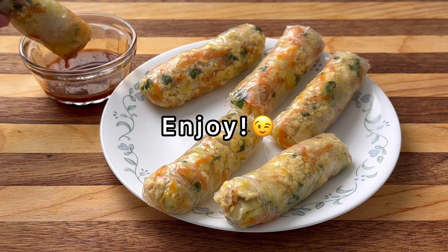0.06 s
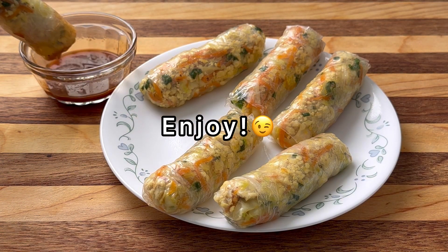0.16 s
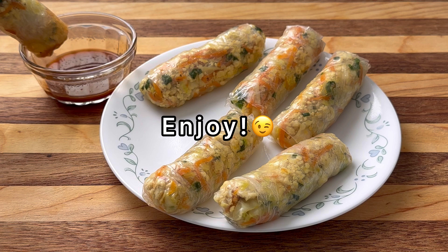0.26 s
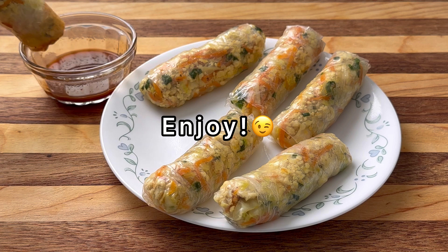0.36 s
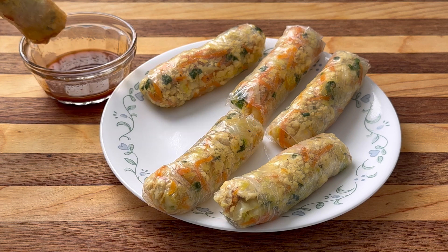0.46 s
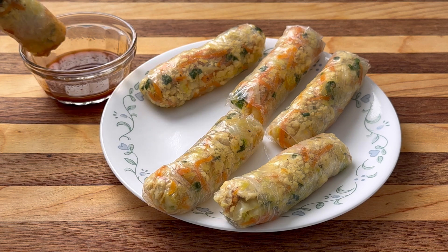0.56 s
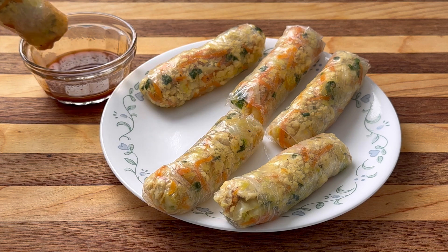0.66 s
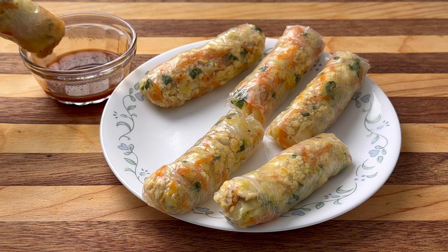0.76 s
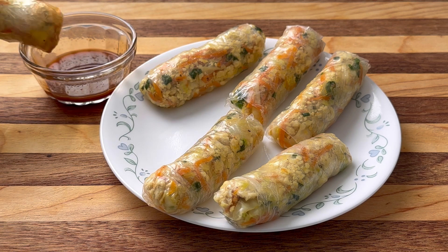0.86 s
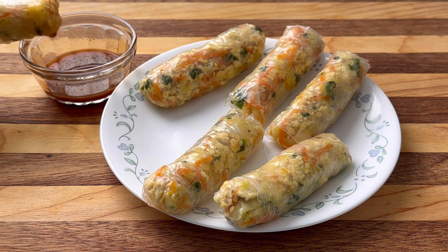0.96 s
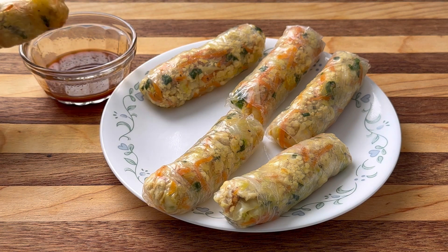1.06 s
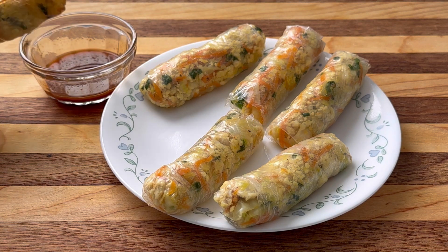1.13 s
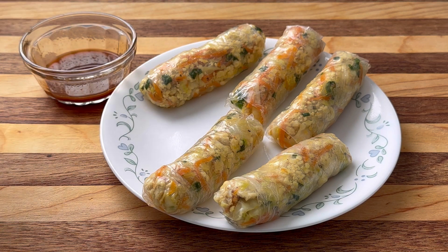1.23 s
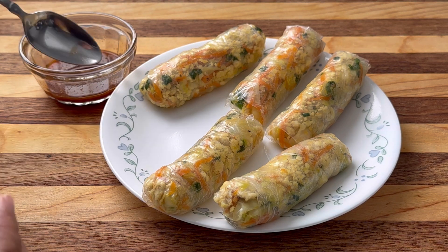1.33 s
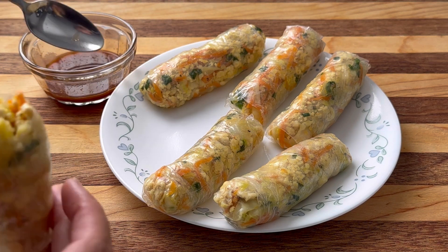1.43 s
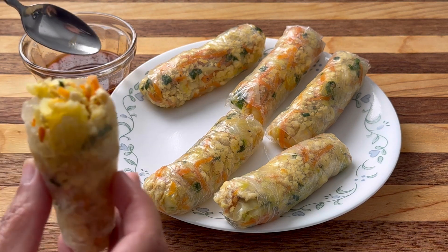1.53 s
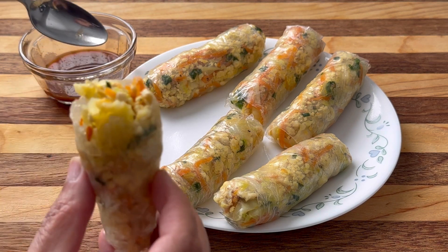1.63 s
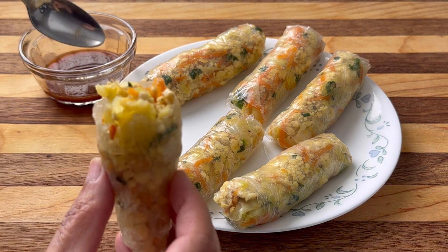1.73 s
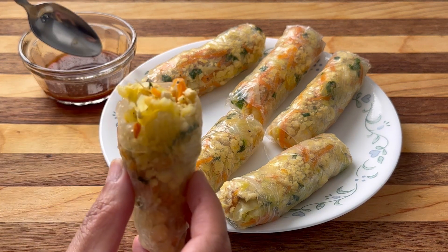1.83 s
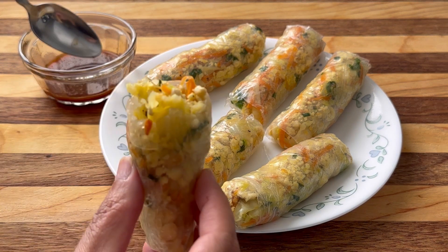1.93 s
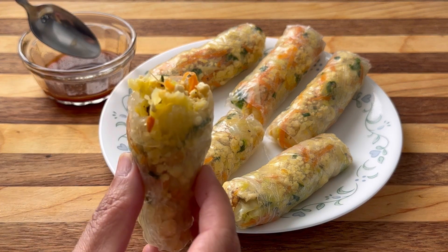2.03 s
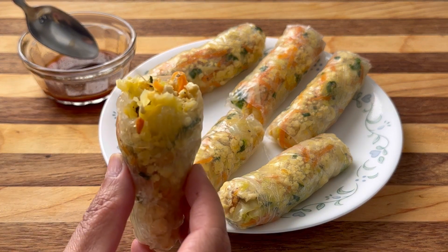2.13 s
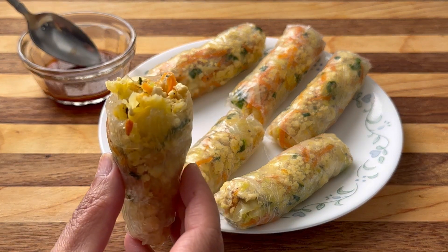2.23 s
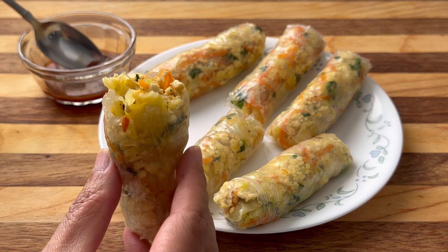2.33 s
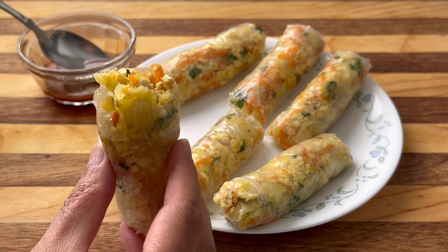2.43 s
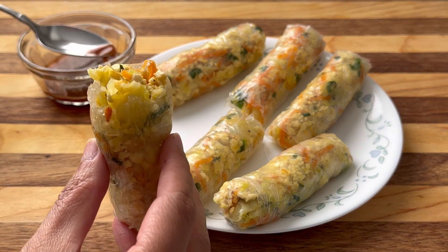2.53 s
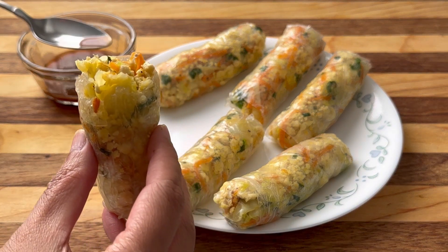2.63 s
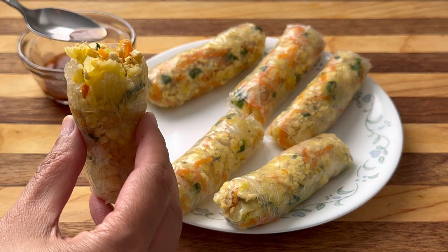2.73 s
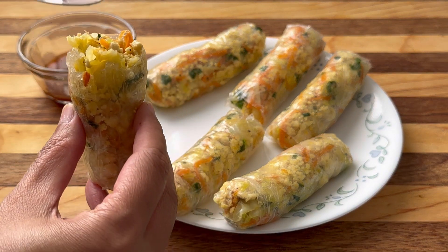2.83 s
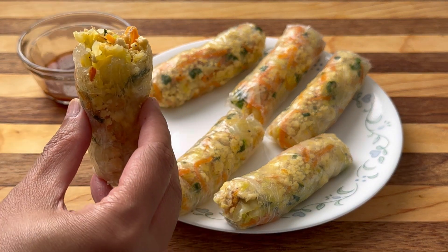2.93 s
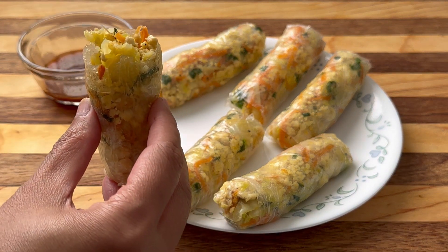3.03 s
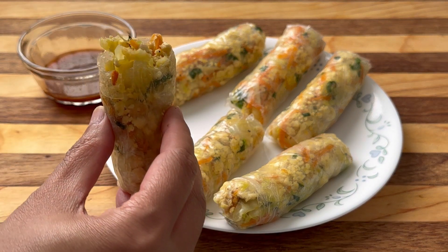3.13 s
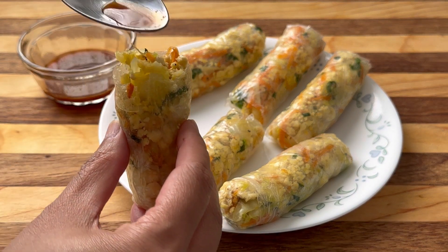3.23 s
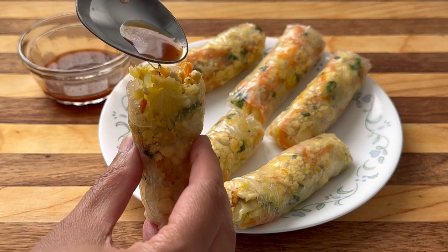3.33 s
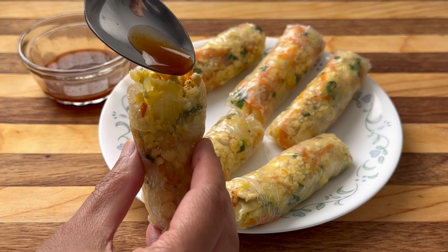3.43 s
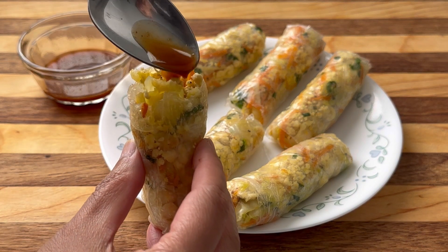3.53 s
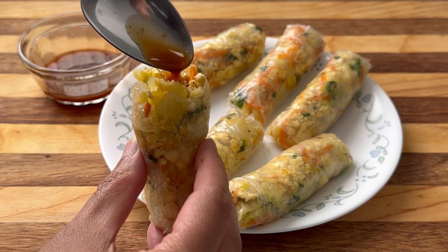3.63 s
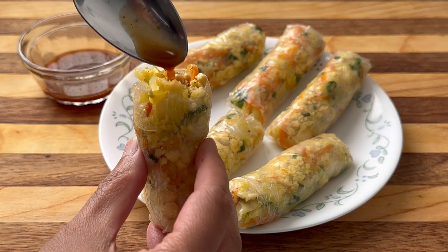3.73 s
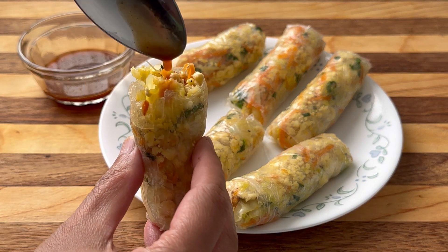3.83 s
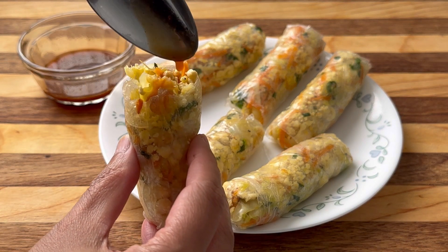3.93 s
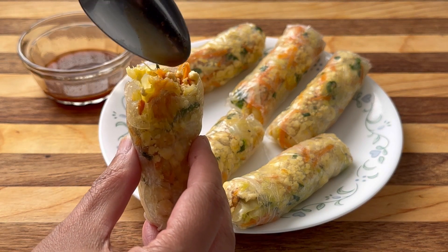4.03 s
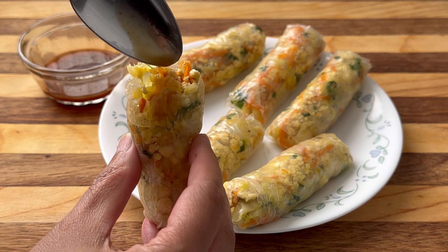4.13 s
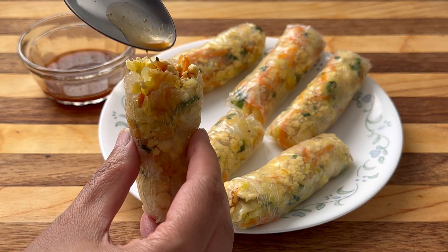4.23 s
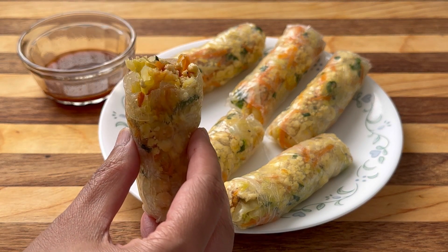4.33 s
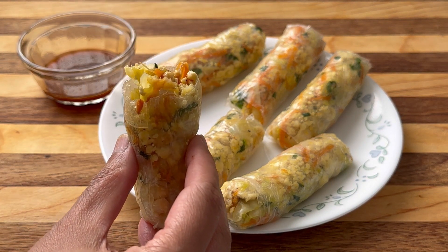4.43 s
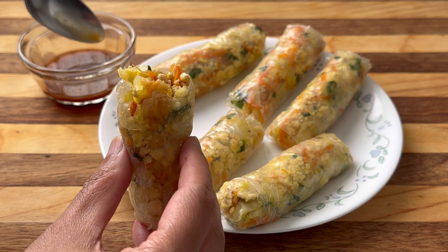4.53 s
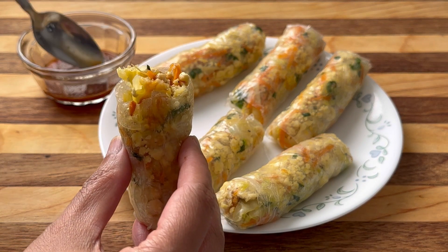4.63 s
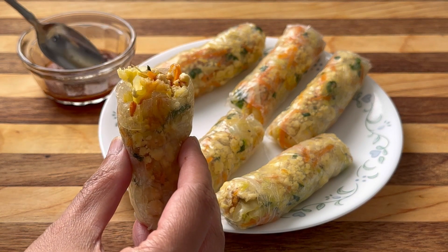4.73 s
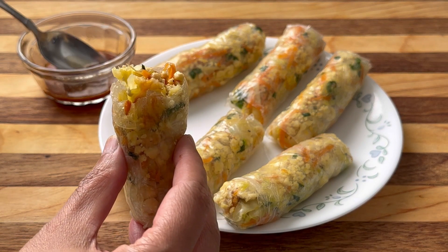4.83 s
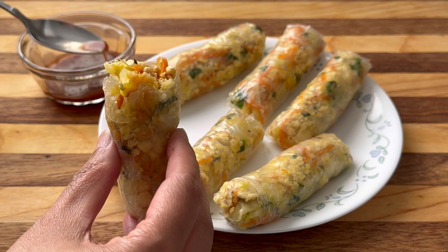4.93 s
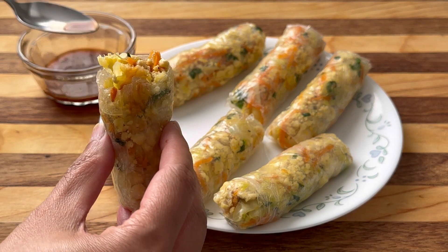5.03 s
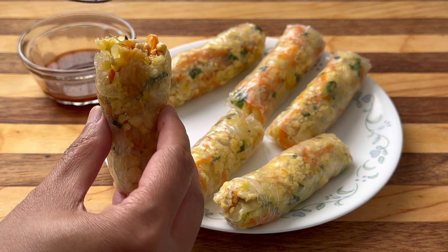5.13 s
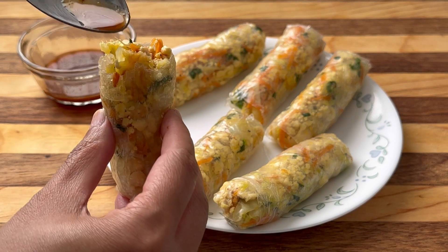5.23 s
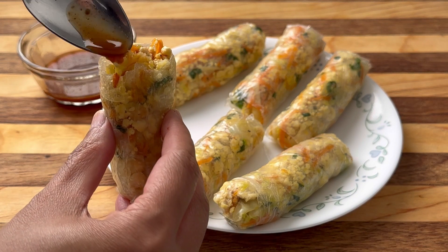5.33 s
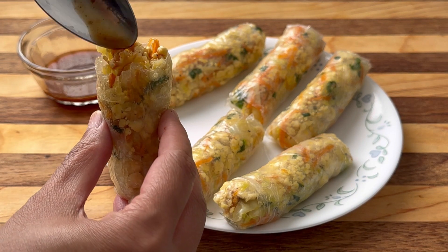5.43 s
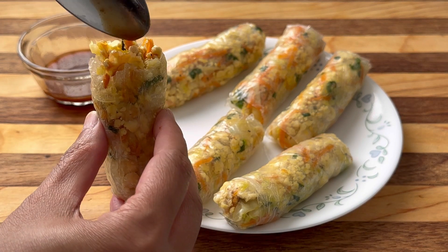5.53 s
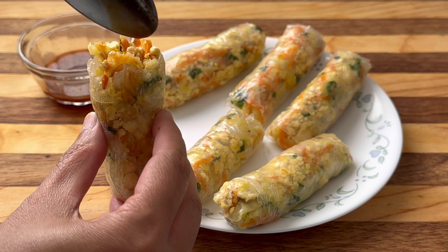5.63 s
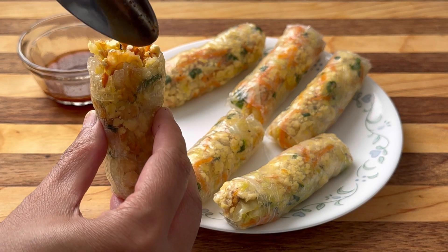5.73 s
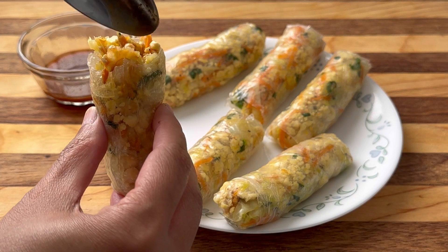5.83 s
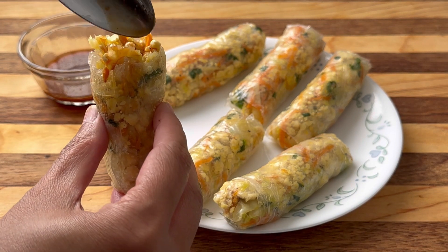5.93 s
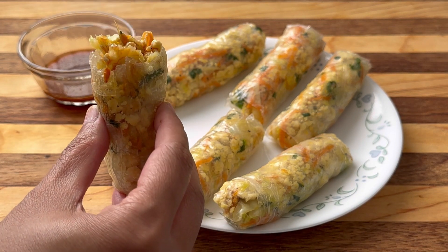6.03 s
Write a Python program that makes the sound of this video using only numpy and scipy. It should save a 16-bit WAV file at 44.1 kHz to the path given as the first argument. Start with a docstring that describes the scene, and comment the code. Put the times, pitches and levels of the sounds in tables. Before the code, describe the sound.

A quiet kitchen heard close above a wooden board, with soft room air, faint hiss, a low hum and wavering far engine drones. A faint wet smack comes at 0.3 s and a barely audible spoon touch on a small glass bowl at 0.6 s. Around 1.1 s there is a low bump; from 1.4 s sticky smacks and fine crackle thicken, with dull finger rubs from 1.6 s. A deeper thud at 1.9 s precedes two bright, short-ringing steel-on-glass clinks at 2.1 and 2.25 s. Another soft thud and handling rumble come near 2.85 s, then scattered moist squishes through 3 to 4 s. A near low drone surges from 4.1 to about 4.9 s; a lighter clink sounds at 4.75 s. The drone returns harsher from 5.15 s, fading near 5.9 s as stronger wet smacks close at 6 s.

```python
"""A quiet kitchen, heard from just above a wooden board: room air, hum and a drone as of engines outside.
Soft wet smacks and sticky crackle of food start at 0.3 s; a steel spoon touches a small glass bowl at 0.6 s.
Dull bumps follow from 1.1 s, finger rubs from 1.6 s, then two bright clinks at 2.1 to 2.3 s.
The near drone surges at 4.1 s and, harsher, at 5.2 s, with a light clink between.
Struck modes make the clinks, shaped noise the wet sounds, wavering sines the drones."""
import sys
import numpy as np
from scipy import signal
from scipy.fft import rfft, irfft
from scipy.io import wavfile
from scipy.ndimage import uniform_filter1d

SR = 44100
rng = np.random.default_rng(int(sys.argv[2]) if len(sys.argv) > 2 else 0)


def wav_out(sig):
    """Save sig, one row per channel (or a flat mono array), as 16-bit PCM at SR to the path in sys.argv[1]."""
    wavfile.write(sys.argv[1], SR, np.round(np.clip(np.atleast_2d(sig).T, -1, 1) * 32767).astype(np.int16))


N = 267687
TIME = np.arange(N) / SR
BIN_HZ = np.maximum(np.fft.rfftfreq(N, 1 / SR), 1)
LEFT_RIGHT = np.array([[1], [-1]])

# wet smacks, levels ahead of the common trim: onset [t/s], body, fizz, sheen [level/dB],
# low pocket, high pocket [f/Hz], high pocket [level/dB], rise [t/s]
SMACKS = [(0.266, -75.5, -83, -85, 2380, 3900, -88, 0.019), (0.942, -70, -78, -88, 1670, 9100, -82, 0.012),
          (.994, -76, -86, -86, 1500, 8970, -78, 0.0082),
          (1.365, -71.5, -78.5, -84, 1890, 5950, -84, 0.024),
          (1.434, -66, -84, -84, 1800, 9180, -86, 0.013), (1.472, -67.5, -76, -73, 2680, 6200, -81, 0.018),
          (1.562, -62, -88, -93, 2600, 3900, -90, 0.011), (1.592, -54.5, -64, -63, 2270, 6000, -62, 0.0052),
          (1.608, -60, -74, -79, 2600, 6700, -79, 0.0064), (1.793, -71, -77, -95, 1860, 6100, -76, 0.0063),
          (1.824, -59.5, -79, -89, 2350, 9000, -80, .007),
          (1.838, -63.5, -70, -72, 1400, 9000, -67, 0.0065),
          (1.856, -59, -69, -73, 1670, 9200, -76, 0.0074), (1.979, -55, -75, -97, 2440, 5420, -83, 0.012),
          (2.003, -63, -74, -90, 2550, 5400, -76, .007), (2.02, -53.5, -65, -66, 2797, 4266, -60, 0.0067),
          (2.203, -64.5, -65, -65, 1650, 3800, -65, 0.017),
          (2.278, -58.5, -80, -92, 1440, 3030, -73, 0.0099), (2.315, -77, -73, -74, 2000, 4000, -82, .009),
          (2.372, -61.5, -65.5, -75, 1810, 6530, -81, 0.015),
          (2.681, -73.5, -84, -99, 1790, 4230, -80, 0.025),
          (2.745, -71, -77.5, -86, 2770, 5950, -74, 0.017),
          (2.824, -67.5, -73, -95, 2750, 6500, -89, 0.015),
          (2.857, -56, -68, -71, 2690, 5970, -65.5, 0.0082),
          (3.099, -57, -60.5, -71, 2300, 8800, -68, 0.006),
          (3.136, -67.5, -80, -96, 1690, 5820, -78, 0.016),
          (3.22, -58.5, -68.5, -75.5, 3000, 4920, -68, 0.015),
          (3.425, -70, -73.5, -82, 2750, 7300, -81, .014), (3.483, -64, -82, -97, 1730, 6420, -71, 0.0053),
          (3.521, -73, -81, -84, 2500, 6300, -79, .01), (3.57, -64, -68.5, -71, 1660, 8750, -74.5, 0.018),
          (3.717, -76.5, -82, -93, 2700, 5970, -78, 0.0058), (3.759, -74, -82, -93, 1700, 4210, -88, 0.011),
          (3.912, -63.5, -75.5, -67, 1640, 6010, -72.5, 0.013),
          (4.119, -63.5, -65.5, -76, 2740, 9700, -78, .014),
          (4.242, -66, -74.5, -72.5, 1510, 8400, -80, 0.0093),
          (4.315, -71, -84, -75, 3300, 6700, -92, 0.01), (4.354, -67.5, -77.5, -82, 3470, 6630, -82, 0.015),
          (4.43, -76, -76, -84.5, 3050, 5470, -81, 0.0089),
          (4.548, -69, -77, -95, 2490, 6600, -71.5, 0.016), (4.648, -57, -71, -86, 3150, 4030, -79, 0.0097),
          (4.678, -60, -66.5, -73, 2380, 5630, -64, 0.006), (4.862, -80, -79, -87, 3300, 5900, -81, .009),
          (4.918, -71.5, -76.5, -94, 2700, 6040, -84, 0.011),
          (5.065, -63, -76.5, -77.5, 1770, 4130, -75.5, 0.018),
          (5.217, -58.5, -68.5, -74, 2290, 5730, -72, 0.011),
          (5.263, -71, -88, -89, 3040, 5980, -86.5, .007),
          (5.417, -67.5, -82, -100, 3100, 5040, -69, 0.0055),
          (5.487, -65.5, -77, -88.5, 1690, 6950, -78, 0.015),
          (5.538, -73.5, -74, -82, 2760, 4450, -78, 0.015), (5.594, -64, -85, -94, 2900, 4120, -84, 0.0084),
          (5.617, -61.5, -67, -71, 1760, 5650, -62.5, 0.0094),
          (5.647, -79, -86.5, -94, 1700, 6300, -70, 0.0067),
          (5.858, -69, -83, -92, 2800, 5000, -79, 0.0091), (5.934, -75, -77, -101, 1890, 5310, -67, 0.0077),
          (5.983, -58, -76, -94, 1520, 4230, -75, 0.0078), (6.0, -53.5, -60, -66, 1760, 5460, -53, 0.0061),
          (6.024, -64.5, -63, -66, 2380, 8900, -68, 0.0061)]
# spectrum of the thin wet sheen: [f/Hz], density [level/dB per Hz]
SMACK_SHEEN = [(9000, -37.5), (11600, -49), (13000, 15.5), (14300, 14), (15800, -5.5)]


def from_db(db):
    """Decibels to gain."""
    return 10 ** (np.asarray(db) / 20)


def rms_one(x):
    """Scale to unit power."""
    return x / np.sqrt(np.mean(x ** 2) + 1e-20)


def in_time(rows):
    """Each column of a curve at every sample."""
    s, *columns = np.transpose(rows)
    return [np.interp(TIME, s, column) for column in columns]


def in_hz(points):
    """A spectrum at every frequency bin, joined along a logarithmic pitch axis."""
    hz, value = np.transpose(points)
    return np.interp(np.log(BIN_HZ), np.log(hz), value)


def drift(rate_hz, order=16):
    """Random wander of unit power that weakens above the rate, drawn on a coarse grid."""
    grid = TIME[::order]
    hz = np.fft.rfftfreq(len(grid), order / SR)
    spectrum = rfft(rng.standard_normal(len(grid))) / (1 + (hz / rate_hz) ** 2)
    return np.interp(TIME, grid, rms_one(irfft(spectrum, len(grid))))


def noise(spectrum):
    """Coloured stereo noise of unit power, with a set likeness and left-right balance at each pitch."""
    # likeness of the two microphones: [f/Hz], correlation [-]
    likeness = [(60, 0.93), (130, 0.65), (300, 0.7), (700, 0.55), (1400, 0.3), (2600, 1), (7000, 0.74),
                (15000, 0.28)]
    # balance of the two microphones: [f/Hz], left over right [level/dB]
    leftward = [(60, 1.5), (130, 3.5), (330, 7), (700, 1), (1300, 4), (2600, -0.5), (15000, 0.5)]
    mid, side = rfft(rng.standard_normal((2, N)))
    alike = np.clip(in_hz(likeness), 0, 1)
    pair = np.sqrt(1 + alike) * mid + LEFT_RIGHT * np.sqrt(1 - alike) * side
    pair = pair * from_db(LEFT_RIGHT * in_hz(leftward) / 2)
    return rms_one(irfft(pair * from_db(in_hz(spectrum)), N))


def add(out, s, sound):
    """Mix a short sound in at time s."""
    start = int(s * SR)
    out[start:start + len(sound)] += sound[:N - start]


def swell(t, rise):
    """Grows to 1 at the rise time, then dies away."""
    return (t / rise * np.exp(1 - t / rise)) ** 2


def spell(start, length, attack, release):
    """Rises over the attack, holds until the length is over, then dies away."""
    t = TIME - start
    return np.clip(t / attack, 0, 1) * np.exp(-np.clip((t - length) / release, 0, 30))


def kitchen(x, t60, wet_db):
    """Adds a diffuse tail, nearly alike at both microphones; its treble dies first."""
    treble_hz, treble_life = 9000, 0.33   # life: share of the t60 left to the treble
    t = TIME[:SR // 2]
    white = rng.standard_normal((2, len(t))) * (t > .004)
    dull = signal.sosfiltfilt(signal.butter(3, treble_hz, fs=SR, output="sos"), white)
    bright = white - dull
    mid, side = dull * from_db(-60 * t / t60) + bright * from_db(-60 * t / (t60 * treble_life))
    tail = (mid + 0.18 * side * LEFT_RIGHT) / np.sqrt(np.sum(mid ** 2))
    return x + from_db(wet_db) * signal.fftconvolve(x * np.ones((2, 1)), tail, axes=1)[:, :N]


def reflections(x):
    """Early echoes off plate, board and hands comb the spectrum; the comb has unit mean power."""
    # echoes in alternating polarity: delay [t/s], [level/dB]
    echoes = [(.0009, -34), (.0017, -38.5), (.0029, -29), (.0041, -17.5), (.0056, -15.5)]
    comb = 1
    for k, (lag, db) in enumerate(echoes):
        comb = comb + (-1) ** k * from_db(db) * np.exp(-2j * np.pi * BIN_HZ * lag)
    return irfft(rfft(x) * comb / np.sqrt(np.mean(abs(comb) ** 2)), N)


def two_ports(x, lag_s):
    """The left microphone hears a near source a moment before the right."""
    return irfft(rfft(x) * np.exp(np.pi * 1j * BIN_HZ * lag_s * LEFT_RIGHT), N)


def air():
    """Steady room air, a faint hiss that slowly swells and sinks, and a few swells of low handling rumble."""
    # room air: [f/Hz], density [level/dB per Hz]
    air_spectrum = [(20, -33.5), (42, -24.5), (55, -8.5), (90, -5.5), (150, -6), (195, -16.5), (260, -14),
                    (410, -17.5), (700, -20), (1050, -25.5), (1550, -35.5), (2400, -44), (3400, -52),
                    (4400, -59), (16000, -75)]
    # hiss: [f/Hz], density [level/dB per Hz]
    hiss_spectrum = [(400, -1.5), (1600, 4.5), (2700, 0), (3600, -2.5), (4300, -11.5), (6500, -16.5),
                     (10000, -15.5), (11500, -39.5), (14000, -19)]
    # course of the hiss: [t/s], [level/dB]
    hiss_level = [(0, -75), (.22, -75), (.42, -76), (.52, -77.5), (.7, -77.5), (1.3, -78), (1.6, -72),
                  (2.2, -77.5), (2.6, -76), (4.0, -78.5), (6.07, -75)]
    # rumble: [f/Hz], density [level/dB per Hz]
    rumble_spectrum = [(20, -8.5), (35, -3.5), (60, 10.5), (90, 7.5), (140, -27.5), (400, -72)]
    # swells of rumble: start [t/s], length [t/s], [level/dB]
    rumbles = [(1.11, 0.2, -57), (2.884, .13, -49.5), (3.062, 0.13, -55.5), (3.261, 0.06, -51),
               (3.558, 0.18, -51.5), (4.448, 0.22, -54), (5.097, 0.041, -52)]
    rumble = sum(from_db(db) * spell(s, length, attack=0.028, release=0.033) for s, length, db in rumbles)
    hiss = from_db(in_time(hiss_level)[0]) * noise(hiss_spectrum)
    return from_db(-57.5) * noise(air_spectrum) + hiss + rumble * noise(rumble_spectrum)


def drone_tone(hz, db, flutter_db=1.72):
    """A sine that follows a moving pitch while its level flutters."""
    level = np.sqrt(2) * from_db(db + flutter_db * drift(2.0))
    return level * np.sin(2 * np.pi * np.cumsum(hz) / SR)


def drones(waver_hz=0.52, hum_waver=.011):
    """Low engine tones come and go over a slightly wavering hum; the second near surge is the harsher."""
    # appliance hum: [f/Hz], [level/dB]
    hum_tones = [(83, -56.5), (168, -70), (225, -71.5), (409, -75.5), (555, -81), (710, -79.5),
                 (1066, -82.5)]
    # far drone: [t/s], [f/Hz], [level/dB]
    far_drone = [(0, 106, -58), (.6, 102.3, -63.5), (1.1, 100.6, -56.5), (1.5, 103.7, -67),
                 (2.1, 108.6, -49.5), (2.4, 110.7, -54), (2.75, 111.7, -53.5), (3.2, 107.5, -60),
                 (3.7, 97.2, -61), (6.07, 101.4, -74)]
    # fainter, higher far drone at the start: [t/s], [f/Hz], [level/dB]
    high_drone = [(0, 159.8, -65), (.6, 157, -69), (.9, 153.1, -60), (1.2, 146.3, -70.5),
                  (1.45, 140.3, -63), (1.75, 139.2, -62.5), (2.0, 136, -89)]
    # near drone, its fundamental: [t/s], [f/Hz]
    near_pitch = [(0, 68.5), (4.2, 76.5), (4.8, 74.5), (5.2, 76), (5.6, 74.5), (6.07, 71)]
    # near drone, its harmonics: multiple of the fundamental [-], relative [level/dB]
    near_orders = [(1, 2), (2, -24.5), (3, -24), (4, -31.5)]
    # near surges: start [t/s], length [t/s], first [level/dB], growth [dB/s],
    # overtones' added [level/dB], their growth [dB/s]
    surges = [(4.114, 0.81, -51, 5, -6, 2.5), (5.151, 0.76, -43.5, -1.5, 0.5, 9.5)]
    pitch = in_time(near_pitch)[0] + waver_hz * drift(1.74)
    base, *overtones = [drone_tone(multiple * pitch, db) for multiple, db in near_orders]
    near = 0
    for s, length, db, growth, overtone_db, harshening in surges:
        age = np.clip(TIME - s, 0, length)
        load = from_db(db + growth * age) * spell(s, length, attack=0.055, release=0.4)
        near = near + load * (base + from_db(overtone_db + harshening * age) * sum(overtones))
    far = 0
    for hz, db in (in_time(far_drone), in_time(high_drone)):
        far = far + drone_tone(hz + waver_hz * drift(7.3), db)
    hum = sum(drone_tone(hz * (1 + hum_waver * drift(11.99)), db) for hz, db in hum_tones)
    return (near + far + hum) * from_db([[.9], [-1]])   # left +0.9 dB, right -1 dB


def pocket(hz, width_hz, size):
    """Noise of unit power ringing in one small cavity."""
    b, a = signal.iirpeak(hz, hz / width_hz, fs=SR)
    once = signal.lfilter(b, a, rng.standard_normal(size))
    return rms_one(signal.lfilter(b, a, once))


def shifting_colour(x, size=512, shift_db=2.6):
    """Wet pockets open and close, so each narrow band swells and fades on its own within some 20 ms."""
    frames = signal.stft(x, nperseg=size)[2]
    chance = rng.standard_normal(frames.shape[1:])
    over_pitch = uniform_filter1d(chance, size=4, axis=0)
    patches = rms_one(uniform_filter1d(over_pitch, size=4, axis=1))
    return signal.istft(frames * rms_one(from_db(shift_db * patches)), nperseg=size)[1][:, :N]


def smacks(grain_db=3.5, grain_hz=170, low_db=-4, width_hz=900, trim_db=-1.5):
    """Sticky films part in grainy bursts of body, fizz and sheen; each sounds a low and a high wet pocket."""
    # body of the smacks: [f/Hz], density [level/dB per Hz]
    body_spectrum = [(300, -1), (1100, 0.5), (1750, 14), (2300, 0), (3000, 5.5), (3700, -2.5), (4400, -0.5),
                     (5400, -28.5), (9000, -58)]
    # fizz of the smacks: [f/Hz], density [level/dB per Hz]
    fizz_spectrum = [(2500, -24.5), (4300, 8.5), (6300, 9), (7600, -2), (10400, 1.5), (11600, -27.5),
                     (13000, -44)]
    t = TIME[:SR // 5]
    out, forces = np.zeros(N), np.zeros((3, N))
    for s, body_db, fizz_db, sheen_db, low_hz, high_hz, high_db, rise in SMACKS:
        burst = swell(t, rise)
        for hz, db in ((low_hz, body_db + low_db), (high_hz, high_db)):
            add(out, s, from_db(db) * burst * pocket(hz, width_hz, size=len(t)))
        for force, db in zip(forces, (body_db, fizz_db, sheen_db)):
            add(force, s, from_db(db) * burst)
    for force, spectrum in zip(forces, (body_spectrum, fizz_spectrum, SMACK_SHEEN)):
        grain = rms_one(from_db(grain_db * drift(grain_hz)))
        out = out + force * grain * noise(spectrum)
    return from_db(trim_db) * kitchen(reflections(shifting_colour(out)), t60=0.27, wet_db=-13.0)


def stickiness(idle_db=-104, after_db=-16, after_s=0.034, clump_db=4.5, clump_hz=40):
    """Strength of the crackle, in clumps: it holds during each squeeze and dies away after each smack."""
    # spells of fine sticky crackle: start [t/s], length [t/s], [level/dB]
    squeezes = [(1.356, 0.47, -80), (1.72, 0.23, -76), (2.187, 0.037, -63), (2.256, 0.13, -74),
                (2.676, 0.16, -75.5), (3.484, 0.083, -75), (3.717, 0.055, -81), (4.293, 0.22, -77),
                (4.86, 0.058, -84), (5.007, 0.061, -79), (5.156, 0.05, -73.5), (5.378, 0.039, -79),
                (5.818, 0.1, -77.5)]
    squeezed = [from_db(db) * spell(s, length, attack=.03, release=.04) for s, length, db in squeezes]
    # after_db is set against the body of the smack
    smacked = [from_db(db + after_db) * spell(s, rise, rise, after_s) for s, db, *_, rise in SMACKS]
    clumps = rms_one(from_db(clump_db * drift(clump_hz)))
    return clumps * np.sqrt(from_db(idle_db) ** 2 + sum(part ** 2 for part in squeezed + smacked))


def crackle(per_s=7000, size_db=3.0, rise_s=0.0013, tilt_db=-3.0, count=24, sheen_db=-16.5):
    """Tiny wet pockets burst at random, each ringing briefly at its own pitch; higher ones are fainter."""
    swing_db, swing_hz = 3.5, 14   # each pitch comes and goes on its own
    sizes = from_db(size_db * np.minimum(rng.exponential(1, N), 3)) * rng.choice([-1, 1], N)
    clicks = sizes * (rng.random(N) < per_s / SR)
    dealt = rng.integers(0, count, N)   # which pitch each click gets
    t = TIME[:SR // 50]
    out = 0
    for k, hz in enumerate(np.geomspace(1300, 7400, count)):
        loudness = from_db(tilt_db * np.log2(hz / 1300))   # tilt per octave
        grain = loudness * swell(t, rise_s) * np.sin(2 * np.pi * hz * t)
        struck = clicks * (dealt == k) * from_db(swing_db * drift(swing_hz))
        out = out + signal.oaconvolve(struck, grain)[:N]
    # the pockets are dull above 8.5 kHz
    out = signal.sosfilt(signal.butter(4, 8500, fs=SR, output="sos"), out)
    wet = rms_one(out) + from_db(sheen_db) * noise(SMACK_SHEEN)
    return kitchen(stickiness() * wet, t60=0.1, wet_db=-11.0)


def ring(t, hz, t60):
    """One dying mode."""
    return np.sin(2 * np.pi * hz * t) * from_db(-60 * t / t60)


def clinks(contact_s=.004, crack_rise_s=0.00099, crack_t60=0.0086, knock_rise_s=0.0033):
    """Each contact rings bowl and spoon and knocks on the board; its spot on the glass sets the bowl's modes."""
    # spoon meets glass: [t/s], bowl, spoon, crack, knock [level/dB], build-up of the ring [t/s]
    contacts = [(.578, -70.5, -95, -97, -92, 0.014), (2.1078, -51, -62.5, -38, -49, .0006),
                (2.1103, -34, -63.5, -48, -50, 0.00025), (2.1148, -31.5, -65, -48, -59, .004),
                (2.125, -59.5, -70, -53, -47.5, .002), (2.212, -53.5, -75, -72.5, -56.5, 0.0071),
                (2.252, -36.5, -56, -37, -47.5, 0.00032), (2.2615, -53, -72.5, -59, -52.5, .002),
                (4.7643, -51.5, -45, -52.5, -55.5, 0.00047)]
    # where on the bowl each contact lands: spot number [-]
    spots = [0, 0, 0, 1, 1, 0, 2, 2, 3]
    # glass bowl, many modes in close pairs: [f/Hz], t60 [t/s], relative [level/dB] at spots 0, 1, 2, 3
    bowl = [(3342, .24, -.5, -30, -7, -4), (3424, .2, -7, -30, -3, -20), (8043, .23, -26, -12, -4.5, -21),
            (8096, .19, -24, -17, -3.5, -30), (8059, .11, -20, 0, -18, -30), (14325, .13, -28, -34, 0, -24),
            (14375, .08, -26, -28, -7, -35), (3520, .08, -14, -30, -25, -22),
            (3639, .13, -19, -30, -27, -28), (3753, .12, -18, -30, -21, -28),
            (6876, .15, -26, -30, -23, -21), (8240, .07, -18, -18, -9, -28),
            (8385, .06, -15, -26, -14, -28), (1528, .05, -19, -26, -23, -7), (4480, .014, -13, -30, 0, -30),
            (4660, .012, -4, -25, 2, -30), (7340, .07, -11, -23, -20, -3)]
    # steel spoon: [f/Hz], t60 [t/s], relative [level/dB]
    spoon = [(800, .07, -6), (1670, .05, -12.5), (2346, 0.1, -8.5), (2580, 0.028, -2.5), (3380, 0.027, -9),
             (7180, 0.012, 9), (8860, 0.045, -10), (10680, 0.075, -12)]
    # crack of the contact: [f/Hz], density [level/dB per Hz]
    crack_spectrum = [(900, -11.5), (2200, -14), (3400, 2.5), (4500, -1.5), (5400, -10.5), (7600, 0),
                      (9600, -4.5), (10400, -10.5), (11400, -32), (13000, -12.5), (14500, -9), (15800, -21)]
    # knock of the bowl on the board: [f/Hz], density [level/dB per Hz]
    knock_spectrum = [(120, -4), (250, 2.5), (480, 5.5), (800, 2.5), (1150, -4.5), (1550, 1.5),
                      (2200, -15.5), (3000, -15.5), (5000, -27), (10000, -51)]
    t = TIME[:SR // 2]
    tones, force, push = np.zeros((3, N))
    for spot, (s, ring_db, spoon_db, crack_db, knock_db, build_s) in zip(spots, contacts):
        glass = sum(from_db(ring_db + dbs[spot]) * ring(t, hz, t60) for hz, t60, *dbs in bowl)
        steel = sum(from_db(spoon_db + db) * ring(t, hz, t60) for hz, t60, db in spoon)
        add(tones, s, (glass + steel) * (1 - np.exp(-t / build_s)))
        # the steel chatters on the glass for a moment before it leaves
        chatter = from_db(crack_db - 60 * np.maximum(t - contact_s, 0) / crack_t60)
        add(force, s, chatter * (1 - np.exp(-t / crack_rise_s)))
        add(push, s, from_db(knock_db) * swell(t, knock_rise_s))
    crack = kitchen(reflections(force * noise(crack_spectrum)), t60=.18, wet_db=-9.5)
    knock = kitchen(push * noise(knock_spectrum), t60=0.24, wet_db=-6)
    return two_ports(kitchen(tones, t60=.27, wet_db=-40.0) + crack + knock, lag_s=7e-6)


def bumps(lowest_hz=62):
    """Soft knocks swing the board for a few cycles, with a little dull noise."""
    # bumps, ahead of the low cut: [t/s], swing [level/dB], [f/Hz], rise [t/s], thud against swing [level/dB]
    knocks = [(1.115, -40.5, 63, 0.011, -19), (1.93, -27, 84.8, 0.018, -14),
              (1.927, -35.5, 165, 0.0068, -14), (1.978, -36.5, 83.2, 0.027, -16),
              (2.14, -42, 82.4, 0.025, -16), (2.844, -28, 101, 0.0093, -21), (2.845, -36.5, 148, .011, -18),
              (2.907, -42, 81.7, 0.017, -21), (3.458, -38.5, 110, 0.0067, -17),
              (4.641, -43.5, 127, 0.014, -20.5)]
    thud_spectrum = [(40, -23.5), (140, 6.5), (250, -7.5), (500, -15.5), (1500, -58.0), (8000, -85.0)]
    t = TIME[:SR // 4]
    tone, force = np.zeros(N), np.zeros(N)
    for s, db, hz, rise, thud_db in knocks:
        push = from_db(db) * swell(t, rise)
        add(tone, s, push * np.sin(2 * np.pi * hz * t))
        add(force, s, from_db(thud_db) * push)
    # the swing is set to +0.8 dB left, -1 dB right
    both = tone * from_db([[.8], [-1]]) + force * noise(thud_spectrum)
    return signal.sosfilt(signal.butter(2, lowest_hz, "high", fs=SR, output="sos"), both)


def rubs():
    """Fingers shift on the soft roll: brief dull puffs of friction."""
    # rubs: [t/s], [level/dB], rise [t/s]
    puffs = [(1.576, -57, 0.014), (1.741, -61, 0.018), (1.822, -55.5, 0.014), (2.02, -70, 0.0055),
             (2.85, -62, 0.015), (3.225, -69, .016), (3.58, -66, 0.01), (3.72, -65.5, 0.022),
             (4.119, -60.5, 0.014), (4.19, -69, 0.065), (4.65, -69, 0.018), (5.07, -60.5, 0.012),
             (5.984, -61.5, 0.014)]
    # friction: [f/Hz], density [level/dB per Hz]
    rub_spectrum = [(200, -27), (500, 8), (800, 8), (1200, 9.5), (1800, -24), (4000, -37), (10000, -55)]
    force = np.zeros(N)
    for s, db, rise in puffs:
        add(force, s, from_db(db) * swell(TIME[:SR // 2], rise))
    return force * noise(rub_spectrum)


def scene():
    """Everything heard from just above the board; the level dips briefly three times."""
    # middles of the dips: [t/s]
    dip_times = [1.354, 4.513, 5.146]
    dip_s, dip_db = .005, -12   # half length, depth
    dips = from_db(dip_db * sum(np.exp(-((TIME - s) / dip_s) ** 2) for s in dip_times))
    return (air() + drones() + smacks() + crackle() + clinks() + bumps() + rubs()) * dips


def record(dry):
    """The top is cut steeply above 15.8 kHz."""
    return signal.sosfilt(signal.ellip(10, .2, 80, 15800, fs=SR, output="sos"), dry)


dry = scene()
out = record(dry)
wav_out(out)
```